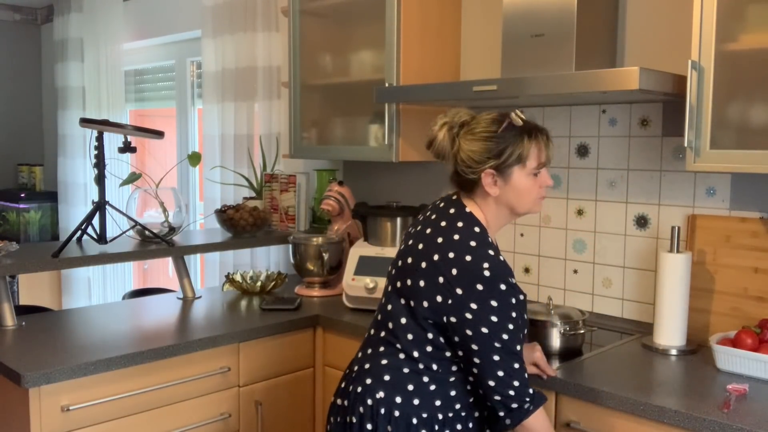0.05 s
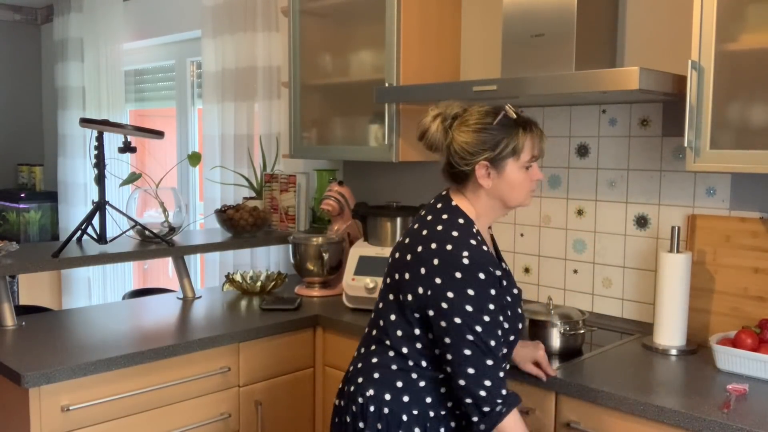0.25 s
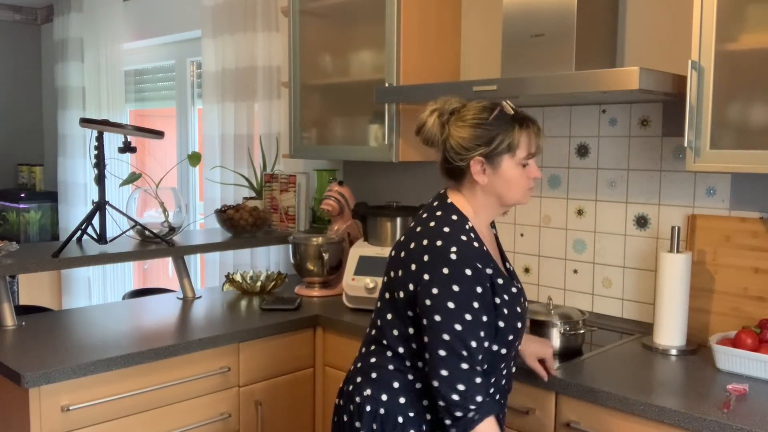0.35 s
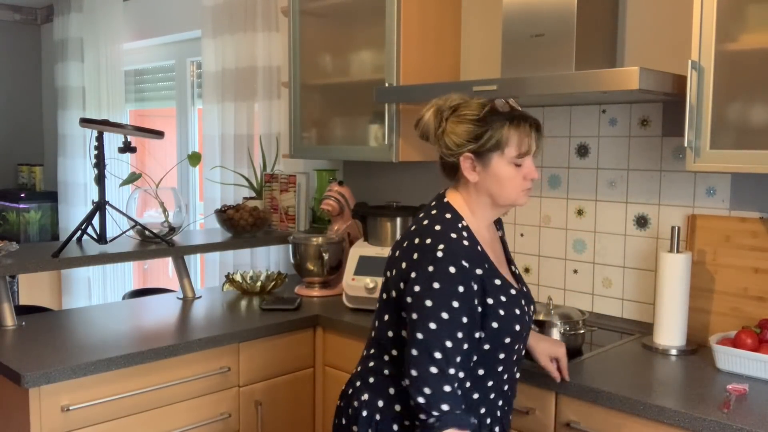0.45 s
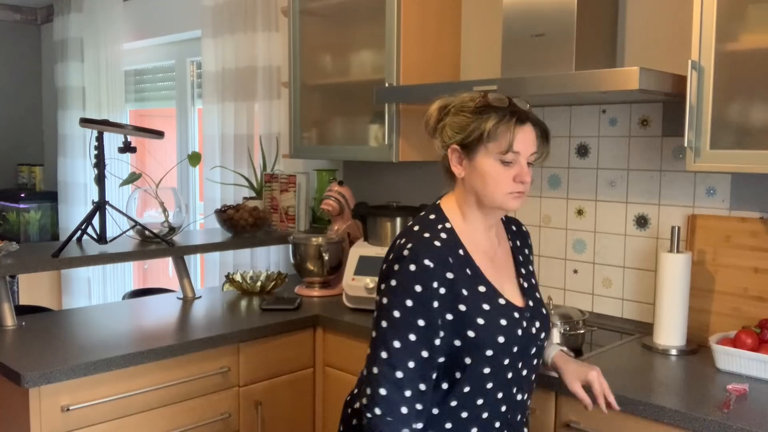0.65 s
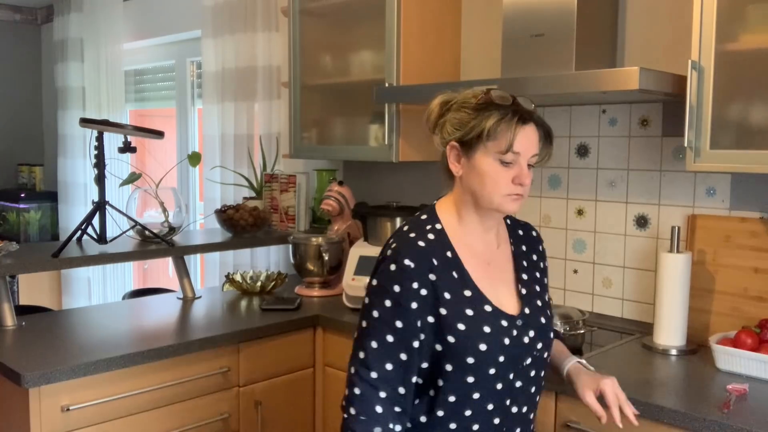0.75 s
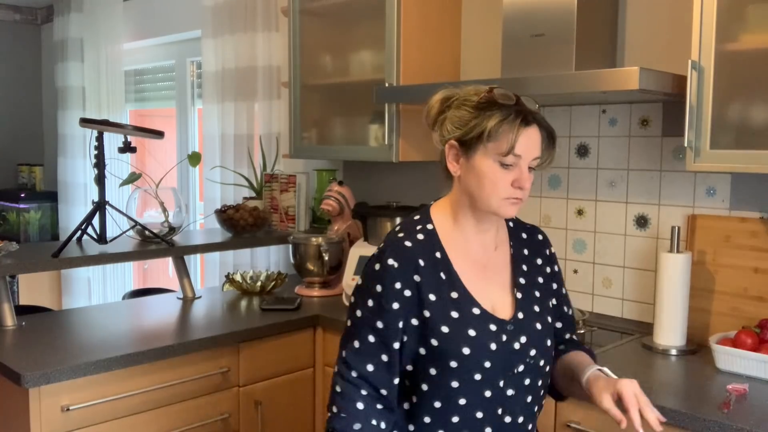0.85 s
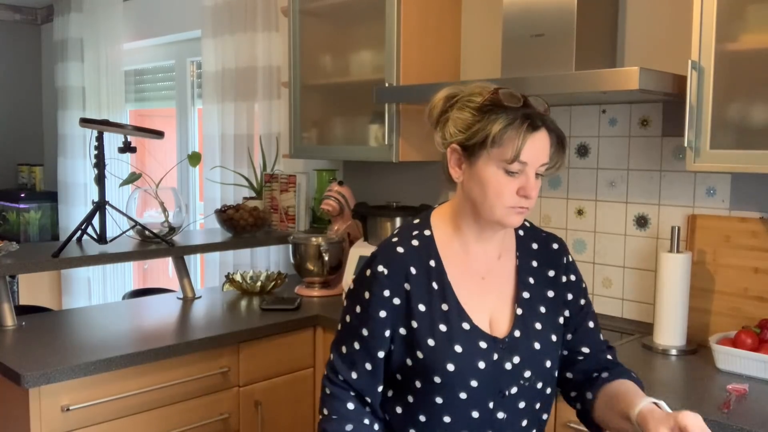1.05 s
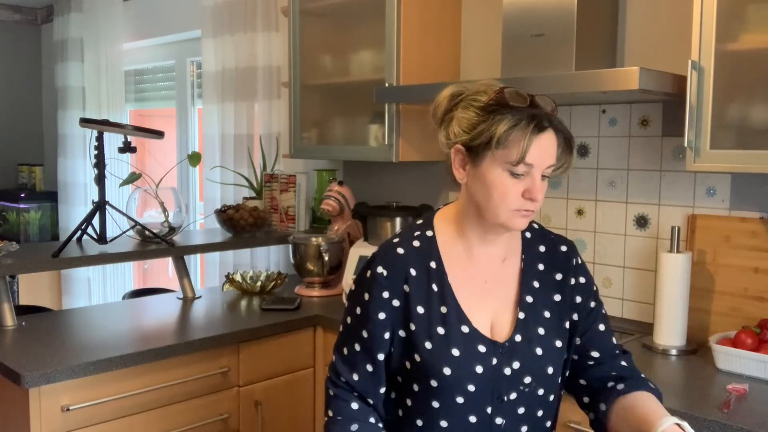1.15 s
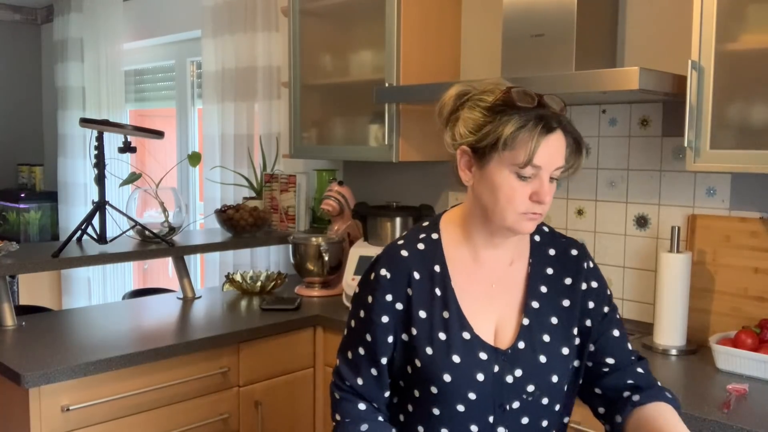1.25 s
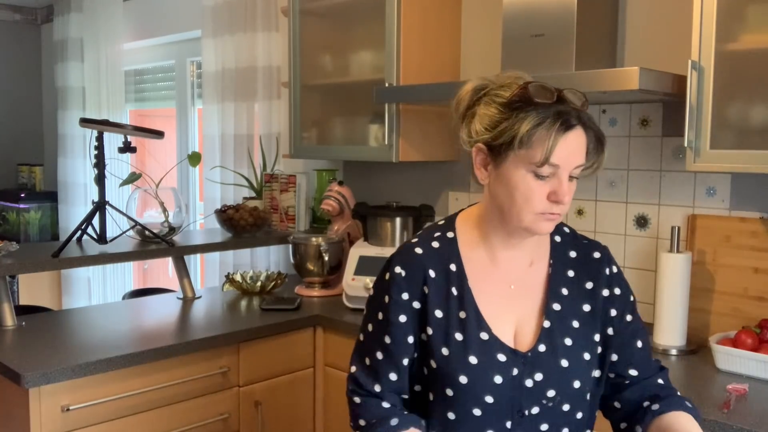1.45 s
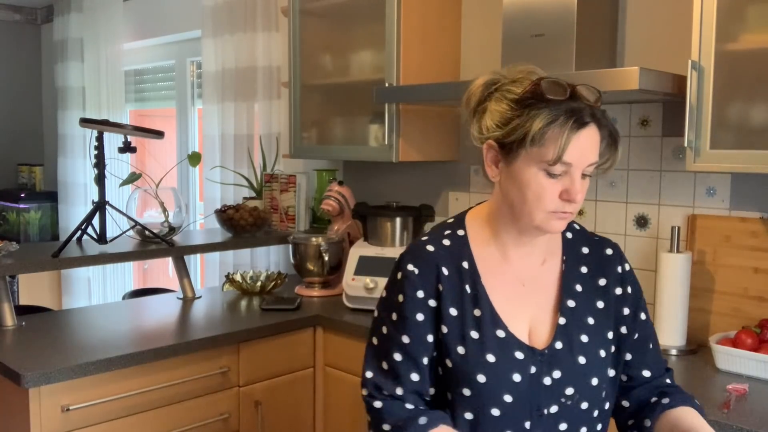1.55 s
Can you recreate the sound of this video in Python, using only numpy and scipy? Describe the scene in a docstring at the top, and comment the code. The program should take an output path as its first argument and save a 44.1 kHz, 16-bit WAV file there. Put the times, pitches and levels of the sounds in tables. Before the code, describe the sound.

In a small, lively home kitchen, a cupboard door knocks shut loudly, its deep thud dying through soft bounces; later come cloth rustle and quiet little taps, with low fridge hum throughout, heard by two spaced microphones.

```python
"""A wooden cupboard door falls shut in a tiled kitchen: a clack, a deep boom and two bounces; later, small taps.
A fridge hums and sleeves rustle behind it. The hum is wavering sine waves, with filtered noise for rumble and air.
Sleeves are noise whose loudness flutters. Clacks and taps are short noise bursts that ring a body and the room.
The boom is a set of low, dying sine waves, started again by each blow. Two spaced microphones hear it in stereo."""
import sys
import numpy as np
from scipy import signal
from scipy.fft import rfft, irfft, next_fast_len
from scipy.io import wavfile
from scipy.ndimage import map_coordinates

SR = 44100
rng = np.random.default_rng(int(sys.argv[2]) if len(sys.argv) > 2 else 0)


def wav_out(sig):
    """Save sig, one row per channel (or a flat mono array), as 16-bit PCM at SR to the path in sys.argv[1]."""
    wavfile.write(sys.argv[1], SR, np.round(np.clip(np.atleast_2d(sig).T, -1, 1) * 32767).astype(np.int16))


N = 70560

# Steady tones of the fridge. Each row: pitch in Hz, relative level in dB, head start of the left channel in radians.
FRIDGE_TONES = [(70.5, -53.5, 0.22), (100.5, -50, 0.2), (298.4, -57.5, 1.64), (481, -70, 1.8),
                (602, -69.5, 2.2), (906, -76, 1.8)]
# Colour of the fridge's low rumble. Each row: frequency in Hz, relative level in dB.
RUMBLE_COLOUR = [(15, -45.5), (30, 1), (48, 10.5), (70, 12), (85, 15.5), (100, 13), (115, -44.5),
                 (140, -39.5)]
# Colour of the room's air noise. Each row: frequency in Hz, relative level in dB.
AIR_COLOUR = [(100, -29.5), (130, 4.5), (250, 3.5), (400, -4), (800, -25), (1200, -14.5), (2000, -30.5),
              (4000, -38.5), (6300, -33), (10000, -21), (15000, -23)]
# Loudness of the sleeves over time. Each row: time in seconds, dull cloth level in dB, bright cloth level in dB.
RUSTLE_LEVELS = [(0, -58, -110.5), (0.199, -51, -94), (0.861, -54.5, -71.5), (.95, -55.5, -61),
                 (1.009, -53.5, -66), (1.07, -59, -71), (1.16, -61.5, -86), (1.25, -64, -91),
                 (1.288, -56.5, -63), (1.316, -49, -56), (1.35, -52, -47), (1.381, -50, -60),
                 (1.432, -45, -64.5), (1.47, -51.5, -69), (1.521, -53.5, -60), (1.6, -63, -64)]
# Colour of the dull cloth noise. Each row: frequency in Hz, relative level in dB.
DULL_CLOTH_COLOUR = [(200, 16), (500, 9), (1500, 7), (3000, -1), (5200, -0.5), (6000, -6.5), (9000, -13)]
# Colour of the bright cloth noise. Each row: frequency in Hz, relative level in dB.
BRIGHT_CLOTH_COLOUR = [(3000, -39), (6000, -14.5), (8500, 6.5), (12000, -6), (15500, -25.5)]
# How long the kitchen echoes. Each row: frequency in Hz, time to fall by 60 dB in seconds.
KITCHEN_DECAY = [(100, 1), (300, 0.44), (1000, 0.44), (3000, 0.62), (6000, 0.43), (12000, 0.11)]
# Colour of the crack in every contact. Each row: frequency in Hz, relative level in dB.
CRACK_COLOUR = [(100, 12), (400, 0.5), (1500, -0.5), (3000, -9), (6500, -18.5), (8500, -41), (11000, -30.5),
                (12500, -29), (13500, -36.5), (15700, -46.5)]
# Small object touching the worktop. Each row: time of the burst's peak in seconds, level in dB,
# favoured pitch in Hz, crack level against the body in dB, burst length in seconds.
OBJECT_TAPS = [(.99, -48, 1480, -8, .025), (1.298, -47, 760, -20, 0.016), (1.32, -46.5, 1200, -12, .03),
               (1.385, -39, 1800, -24, 0.014), (1.402, -62, 1950, -23, 0.014),
               (1.426, -29, 810, -17, 0.011), (1.445, -41.5, 400, -36, 0.02), (1.463, -38, 680, -12, .012),
               (1.522, -60.5, 13000, -2, .008), (1.55, -42.5, 558, -13, .03)]
# Ringing pitches of the small object. Each row: pitch in Hz, width in Hz, relative level in dB.
OBJECT_MODES = [(359, 25, 13), (451, 20, 12), (603, 16, 8.5), (783, 55, 4), (1330, 60, -16),
                (1810, 140, -5.5), (2050, 88, -36), (2460, 150, -7.5), (4450, 470, -24),
                (13500, 2000, -3.5)]
# Door edge and shelf contacts. Each row: time of the burst's peak in seconds, level in dB,
# favoured pitch in Hz, crack level against the body in dB, burst length in seconds.
DOOR_CLACKS = [(.222, -22.5, 1930, -10, 0.019), (.227, -10.5, 1670, 22.5, 0.013),
               (.231, -16, 1640, -19, .01), (.235, -7, 1400, -7.5, .01), (.245, -12, 1606, -3.5, .008),
               (.262, -26, 1826, -10.5, 0.022), (.275, -23.5, 289, -14, .03), (.287, -27.5, 1000, -9, .03),
               (.305, -29, 1053, 4, 0.013), (.33, -49, 1526, 5.5, 0.005), (.35, -27.5, 654, -42.5, .02),
               (.368, -37.5, 1086, -24.5, .012), (.42, -44, 170, -9, 0.049), (.43, -73.5, 1210, 3, 0.037)]
# Ringing pitches of the door panel. Each row: pitch in Hz, width in Hz, relative level in dB.
PANEL_MODES = [(164, 50, 6), (223, 24, -5), (300.7, 38, 9.5), (335, 16, -8), (569, 47, 3.5), (604, 19, -1),
               (773, 93, -8.5), (899, 33, 11), (1026, 54, 4.5), (1122, 27, -8), (1220, 56, -7),
               (1631, 92, 1.5), (2143, 600, -9), (2610, 950, -7.5)]
# Blows of the door on the cupboard. Each row: start in seconds, strength in dB.
DOOR_BLOWS = [(0.228, -6.9), (0.2345, 0.0), (0.319, -10.3), (0.4093, -23.3)]
# Low tones of cupboard and room. Each row: pitch in Hz, relative level in dB,
# time to fall by 60 dB in seconds, direction of the first swing (1 or -1).
BOOM_MODES = [(40.6, -7.0, 0.65, -1), (52.8, -5.4, 0.84, 1), (55.4, -14.0, 0.79, -1), (63.0, -9.0, 0.52, 1),
              (80.9, -27.8, 0.8, -1), (100.3, -20.4, 1.3, 1), (112.8, -22.3, 0.73, -1)]
# Tone colour of what both channels share. Each row: frequency in Hz, gain in dB.
SHARED_COLOUR = [(6000, 1), (7500, -4.5), (9300, -26), (11000, -3.5), (13000, -3.5)]
# Stereo width by pitch: gain of the difference between channels; the highest treble is the same in both.
# Each row: frequency in Hz, gain in dB.
STEREO_WIDTH = [(50, -8.5), (110, 5), (200, 1), (500, 4.5), (12300, -1.5), (12900, -53.5)]

# Fridge: levels and spread of the random wavering in dB, phase wavering in radians
HUM_WAVER_DB, PHASE_WAVER_RAD = 2, 0.4
WHINE_HZ, WHINE_DB = 3330, -82
RUMBLE_DB, RUMBLE_WAVER_DB = -49, 2
AIR_DB, AIR_WAVER_DB = -60, 1.2
# Contacts
ALIKE = 0.64  # share of a burst's power that is common to both channels
FOCUS_DB, FOCUS_FLOOR_DB = 6, -11  # loss one octave from the favoured pitch; deepest loss
BODY_TOP_HZ = 9000  # here the body's treble is halved
LAG_S, LEFT_DB = 0.00045, 1.2  # direct sound is late on the left; left is raised and right lowered by this much
CLACK_ROOM_DB, TAP_ROOM_DB = -3, -5
# Boom: time constant of its soft start, then level and delay of the part that differs between channels
BOOM_ATTACK_S = 0.001
BOOM_SIDE_DB, BOOM_SIDE_S = -12, 0.0036
TOP_HZ = 15714  # no sound is heard above this frequency


def amp(db):
    """Turn decibels into a plain multiplier."""
    return 10 ** (np.asarray(db) / 20)


def unit(x):
    """Scale a sound so that its average strength (rms) is 1."""
    return x / np.sqrt(np.mean(x ** 2) + 1e-20)


def along(points, hz):
    """Read a curve of (Hz, value) points, evenly spaced by octave as the ear hears pitch."""
    f, v = np.transpose(points)
    return np.interp(np.log(hz + 1), np.log(f + 1), v)


def wobble(rate):
    """Draw a smooth random curve with this many random points a second."""
    knots = rng.standard_normal(int(N * rate / SR) + 4)
    return map_coordinates(knots, [np.arange(N) * rate / SR])


def filtered(x, response):
    """Change each frequency of a sound by a response, with silence added so that it does not wrap round."""
    m = next_fast_len(x.shape[-1] + SR // 2)
    spectrum = rfft(x, m) * response(np.fft.rfftfreq(m, 1 / SR))
    return irfft(spectrum, m)[..., :x.shape[-1]]


def rush(colour):
    """Coloured noise of rms 1, unrelated in the two channels."""
    noise = rng.standard_normal((2, N))
    return unit(filtered(noise, lambda hz: amp(along(colour, hz))))


def fridge_hum():
    """Mains and compressor tones, each wavering in loudness and phase."""
    t = np.arange(N) / SR
    tones = np.zeros((2, N))
    for hz, db, lead in FRIDGE_TONES:
        loudness = amp(db + 1.5 + HUM_WAVER_DB * wobble(14.46))
        phase = 2 * np.pi * hz * t + [[lead], [0]] + PHASE_WAVER_RAD * wobble(8.36)
        tones += loudness * np.sin(phase)
    return tones


def motor_whine():
    """A faint, high, unsteady motor tone that swings opposite ways in the two channels."""
    t = np.arange(N) / SR
    loudness = amp(WHINE_DB + 4 * wobble(25))
    return loudness * np.sin(2 * np.pi * WHINE_HZ * t + wobble(40)) * [[1], [-1]]


def fridge_rumble():
    """Low coloured noise that slowly swells and fades."""
    return amp(RUMBLE_DB + RUMBLE_WAVER_DB * wobble(5.6)) * rush(RUMBLE_COLOUR)


def room_air():
    """Quiet coloured noise of the room's air, with slow changes in loudness."""
    return amp(AIR_DB + AIR_WAVER_DB * wobble(1.9)) * rush(AIR_COLOUR)


def sleeves():
    """Cloth noise in a dull and a bright layer; quick random changes in loudness make it grainy."""
    s, dull_db, bright_db = np.transpose(RUSTLE_LEVELS)
    t = np.arange(N) / SR
    dull = amp(np.interp(t, s, dull_db) + 2.2 * wobble(60)) * rush(DULL_CLOTH_COLOUR)
    bright = amp(np.interp(t, s, bright_db) + 1.8 * wobble(120)) * rush(BRIGHT_CLOTH_COLOUR)
    return dull + bright


def kitchen_echo():
    """A fresh stereo room answer made of noise; each frequency dies at its own speed."""
    hz, t, z = signal.stft(rng.standard_normal((2, SR // 2)), SR, nperseg=256)
    fading = z * amp(-60 * t / along(KITCHEN_DECAY, hz)[:, None])
    echo = signal.istft(fading, SR, nperseg=256)[1]
    return np.pad(echo, ((0, 0), (150, 0))) / np.linalg.norm(echo[0])  # starts 150 samples late


def contact_burst(length):
    """The push of one contact: noise that swells to a peak at a third of its length, then dies away."""
    t = np.arange(SR // 5) / SR
    left_right_common = rng.standard_normal((3, len(t)))
    noise = np.sqrt(ALIKE) * left_right_common[2] + np.sqrt(1 - ALIKE) * left_right_common[:2]
    return noise * (t / length) ** 2 * np.exp(-6 * t / length)


def body_response(f, modes, scatter_db, favoured_hz, crack_db):
    """Ringing of a struck body, strongest near the favoured pitch, plus a crack."""
    octaves = np.log2((f + 1) / favoured_hz)
    focus = amp(np.maximum(-FOCUS_DB * octaves ** 2, FOCUS_FLOOR_DB))
    ringing = 0
    for k, (hz, width, db) in enumerate(modes):
        resonance = 1j * f * width / (hz * hz - f * f + 1j * f * width)
        ringing = ringing + (-1) ** k * amp(db + scatter_db[k]) * resonance  # neighbours swing opposite ways
    crack = amp(crack_db + along(CRACK_COLOUR, f))
    return crack + focus / (1 + (f / BODY_TOP_HZ) ** 2) * ringing


def contacts(rows, modes, room_db):
    """Short bursts ring a body and crack; they arrive directly and through the room."""
    out = np.zeros((2, N + 2 * SR))
    lag = round(LAG_S * SR)
    balance = amp([[LEFT_DB], [-LEFT_DB]])
    for peak_s, db, favoured_hz, crack_db, length in rows:
        burst = contact_burst(length)
        scatter_db = rng.normal(0, 2.5, len(modes))  # every contact excites the body a little differently
        hit = filtered(burst, lambda f: body_response(f, modes, scatter_db, favoured_hz, crack_db))
        hit = balance * hit * amp(db) / np.abs(hit).max()
        echo = amp(room_db) * signal.fftconvolve(hit, kitchen_echo(), axes=1)
        at = round((peak_s - length / 3) * SR)
        out[:, at:at + echo.shape[1]] += echo
        out[0, at + lag:at + lag + hit.shape[1]] += hit[0]
        out[1, at:at + hit.shape[1]] += hit[1]
    return out[:, :N]


def worktop_taps():
    """A small object is nudged on the worktop and rings at its own pitches."""
    return contacts(OBJECT_TAPS, OBJECT_MODES, TAP_ROOM_DB)


def door_clacks():
    """The door edge and shelf knock, making the wooden panel ring."""
    return contacts(DOOR_CLACKS, PANEL_MODES, CLACK_ROOM_DB)


def door_boom():
    """Every blow starts the same low tones of cupboard and room, which then die away."""
    boom = np.zeros(N)
    for start_s, strength_db in DOOR_BLOWS:
        t = np.maximum(np.arange(N) / SR - start_s, 0)
        ring = sum(sign * amp(db - 60 * t / t60) * np.sin(2 * np.pi * hz * t)
                   for hz, db, t60, sign in BOOM_MODES)
        boom += amp(strength_db) * ring * (1 - np.exp(-t / BOOM_ATTACK_S))
    # A faint delayed copy makes the two channels differ slightly
    side = amp(BOOM_SIDE_DB) * np.roll(boom, round(BOOM_SIDE_S * SR))
    return np.array([boom - side, boom + side])


def scene():
    """Add up the door, the small object, the sleeves and the fridge with the room's air."""
    door = door_clacks() + door_boom()
    handling = worktop_taps() + sleeves()
    background = fridge_hum() + motor_whine() + fridge_rumble() + room_air()
    return door + handling + background


def record(dry):
    """Round off loud peaks, colour the shared sound, set the stereo width by pitch, cut the top treble."""
    dry = dry / (1 + np.abs(dry / 0.98) ** 8) ** (1 / 8)
    mid = (dry[0] + dry[1]) / 2
    side = (dry[0] - dry[1]) / 2
    mid = filtered(mid, lambda hz: amp(along(SHARED_COLOUR, hz)) * (hz < TOP_HZ))
    side = filtered(side, lambda hz: amp(along(STEREO_WIDTH, hz)) * (hz < TOP_HZ))
    return np.array([mid + side, mid - side])


dry = scene()
out = record(dry)
wav_out(out)
```